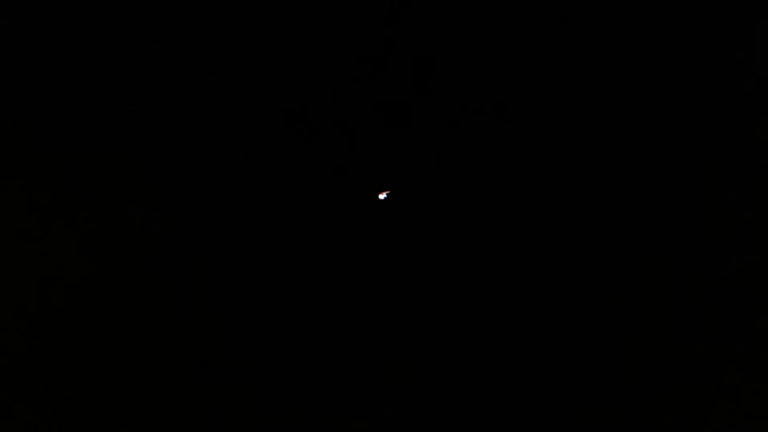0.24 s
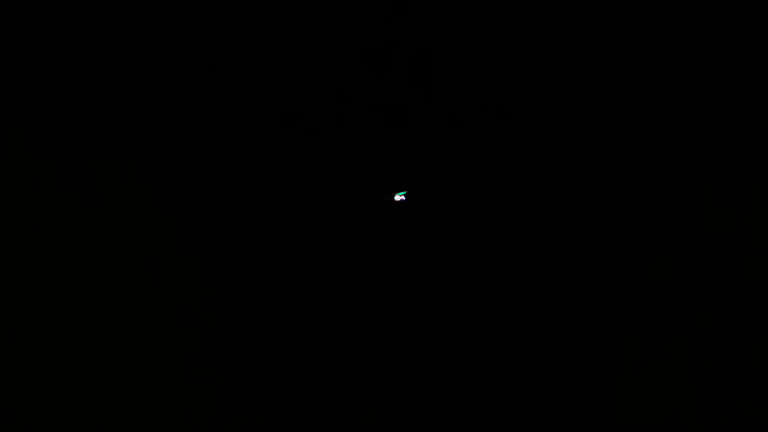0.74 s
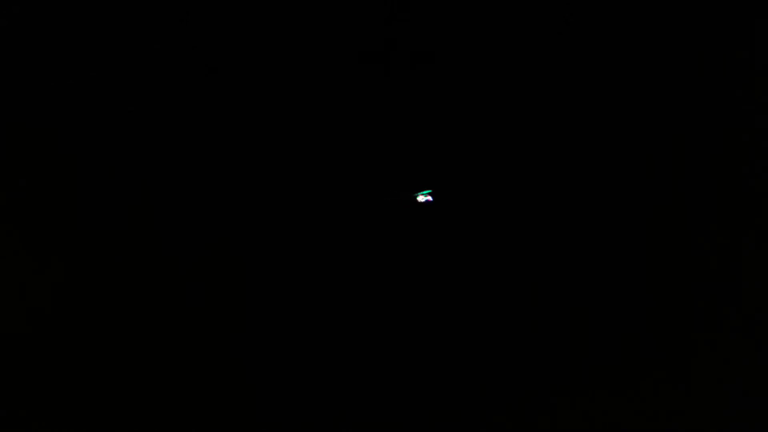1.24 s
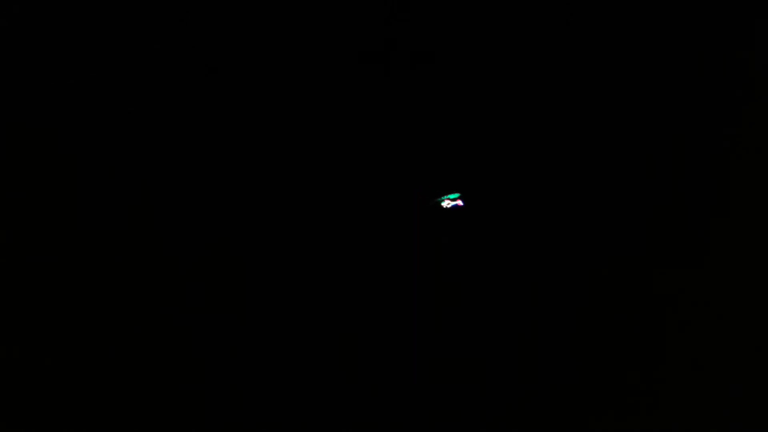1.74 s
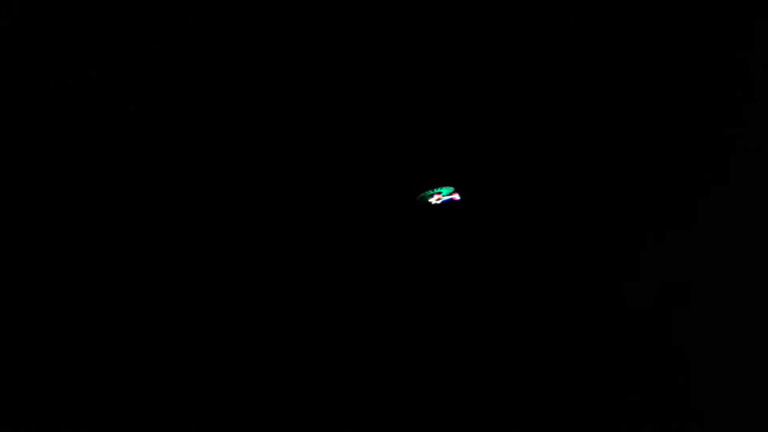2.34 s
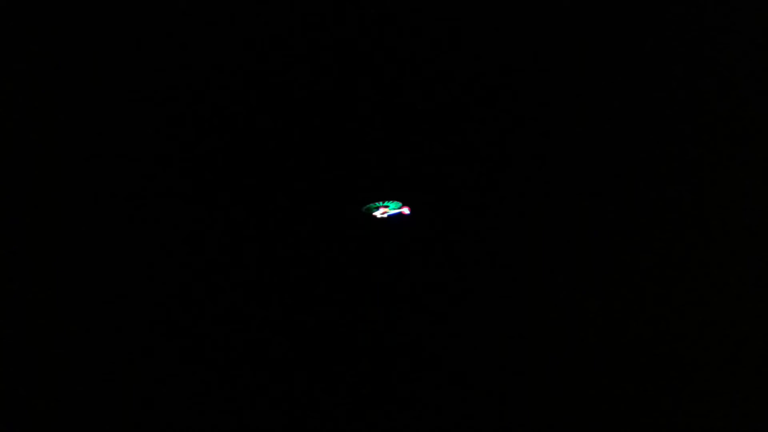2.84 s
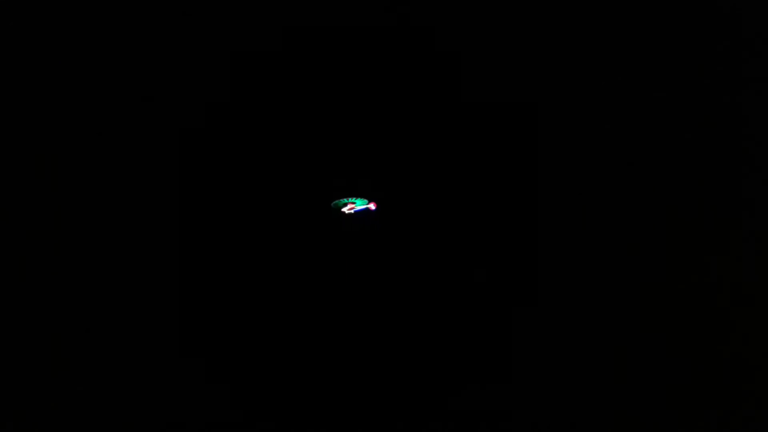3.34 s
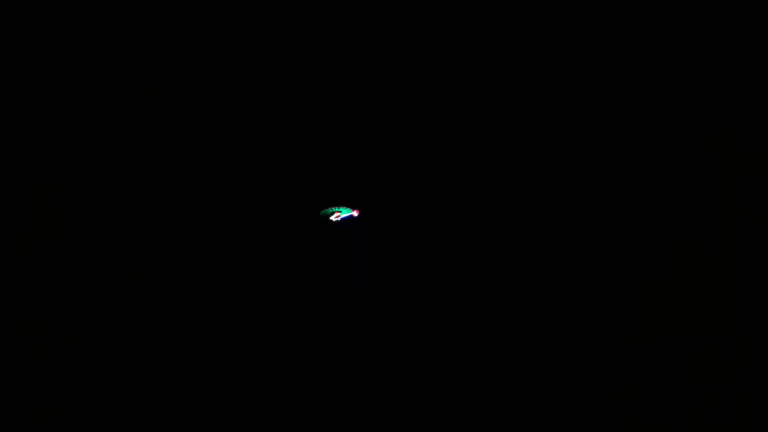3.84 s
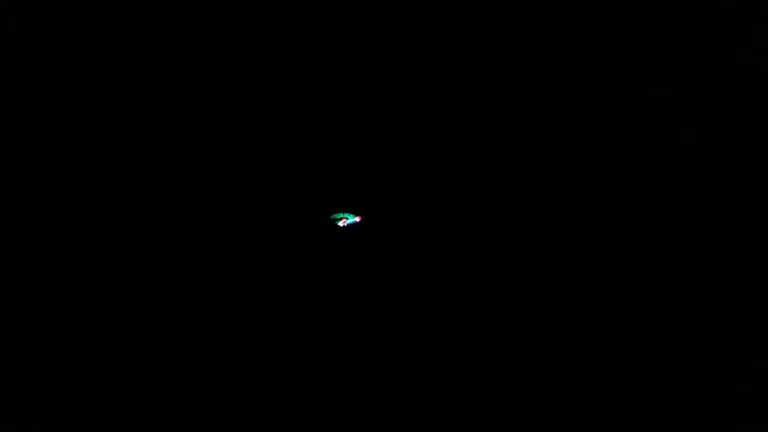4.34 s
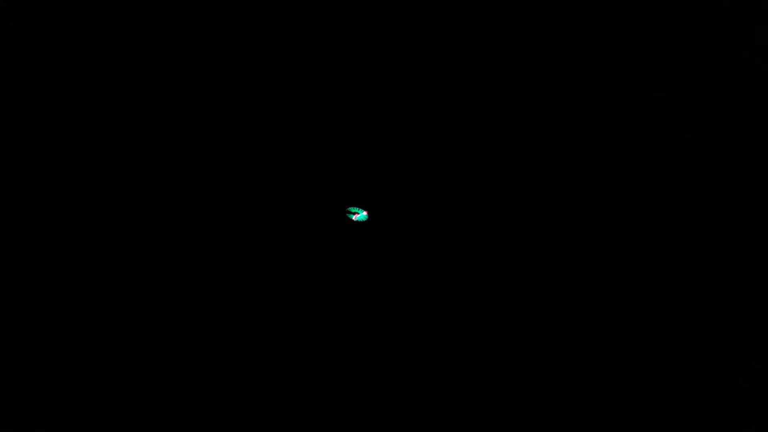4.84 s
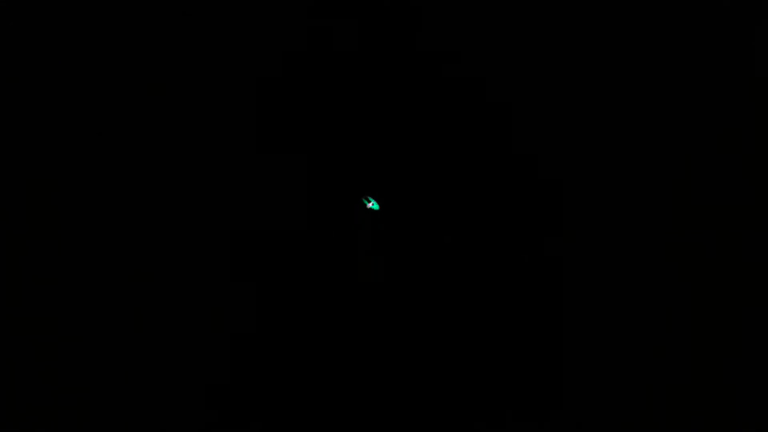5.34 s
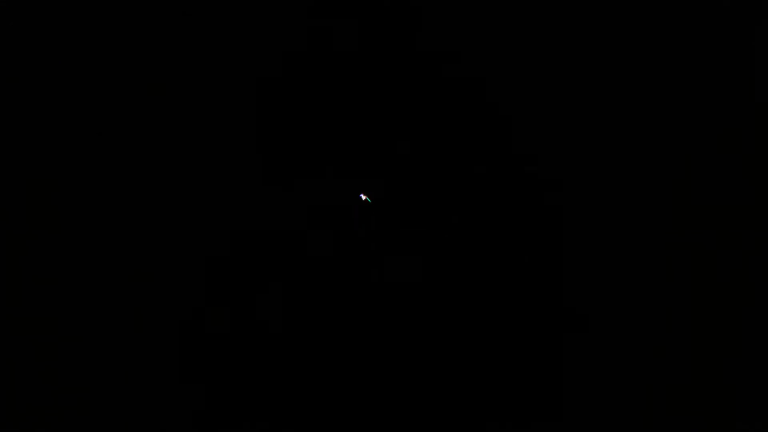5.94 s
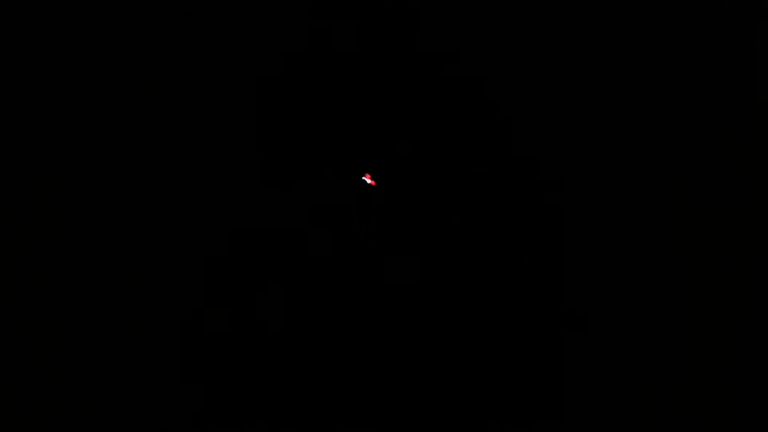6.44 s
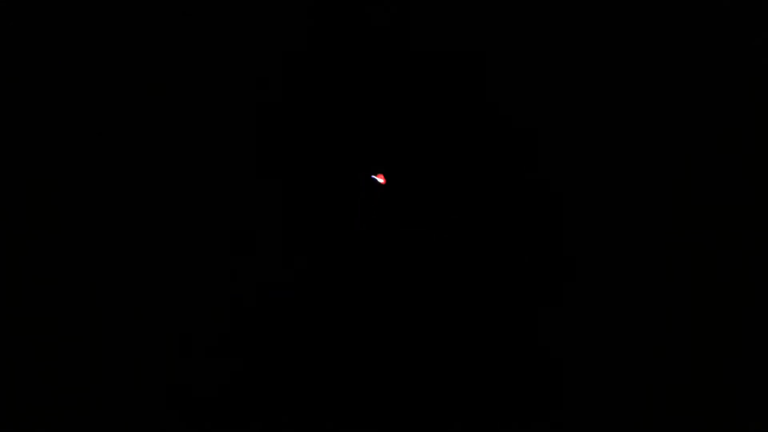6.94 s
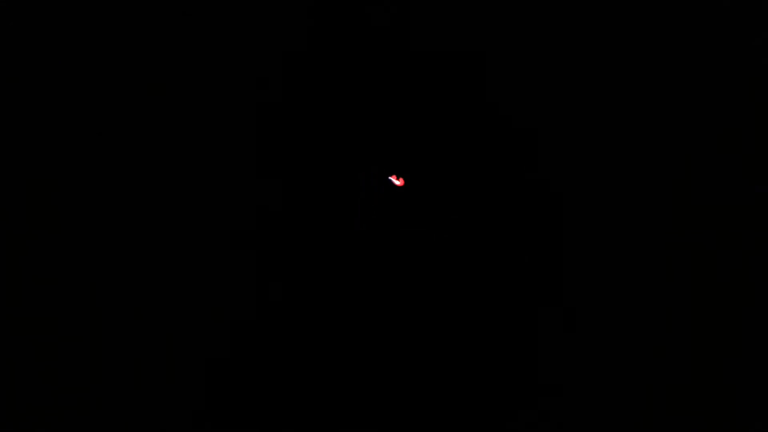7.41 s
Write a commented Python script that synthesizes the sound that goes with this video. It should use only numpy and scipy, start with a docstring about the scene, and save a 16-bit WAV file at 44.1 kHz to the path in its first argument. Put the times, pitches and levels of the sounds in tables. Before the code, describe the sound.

A model helicopter's steady buzz and airy hiss grow nearer, joined by a bright, rasping gear whine as it brakes and passes. After the turn the hiss thins and throbbing motor tones stand out, gliding down, then slightly up. Hard wind gusts hit the unprotected microphone, densest between two and three seconds and again near five, mostly in the right channel, with some early thumps on the left.

```python
"""Open ground: an electric model helicopter flies towards the listener, passes and turns away.
The blades hiss and whistle, chopped by the rotors; the tail rotor buzzes and the motor and gears whine.
One shaft speed sets the pitch of buzz and whine and the pace of the chopping. The ground reflects hiss and buzz.
Gusts of wind rumble and thump on the two microphone ports, mostly the right one."""
import sys
import numpy as np
from scipy import signal
from scipy.fft import rfft, irfft, next_fast_len
from scipy.io import wavfile
from scipy.ndimage import map_coordinates

SR = 44100
rng = np.random.default_rng(int(sys.argv[2]) if len(sys.argv) > 2 else 0)


def digitize_waveform(pressure):
    """Quantize a signal to 16-bit integers and store it at the path in sys.argv[1].

    Rows of a 2-D input are taken as channels; values are limited to [-1, 1].
    """
    field = np.atleast_2d(pressure).T
    bounded = np.clip(field, -1, 1)
    quanta = np.round(bounded * 32767).astype(np.int16)
    wavfile.write(sys.argv[1], SR, quanta)


N = 338247
TIME = np.arange(N) / SR  # seconds

# How loud the blade hiss is, which also tells how near the helicopter is. Each row: time in seconds,
# relative level in dB, relative level of the treble against the middle in dB.
HISS_LEVEL = [(0, -41.5, -8.5), (1.22, -35, -10), (1.29, -32.5, -7), (1.8, -32, -8), (2.3, -23.5, -9.5),
              (2.6, -27.5, -10), (3.04, -22, -10), (3.37, -28.5, -7.5), (4.8, -32.5, -8), (5.35, -38.5, -4),
              (6.17, -46, -3), (6.33, -42, -1.5), (6.8, -39.5, -10), (7.2, -37.5, -13), (7.67, -37, -13.5)]
# How strongly the tail rotor sounds this way. Each row: time in seconds, level in dB,
# highest harmonic that it carries at full strength.
TAIL_ROTOR_BEAM = [(0, -48, 2.7), (1.36, -43.5, 5.5), (2.1, -47.5, 6.5), (3, -45, 19), (4.25, -51, 16),
                   (5.66, -62.5, 3.1), (6.5, -51.5, 4.5), (7.2, -48, 8), (7.67, -46.5, 8.7)]
TAIL_RATIO = 20 / 21  # tail blades passing per motor turn
MAIN_RATIO = 1 / 10  # main rotor turns per motor turn
HARD_GUST_DB = -19  # around this level gusts become abrupt and blow more evenly


def undb(db):
    """Decibels to gain."""
    return 10 ** (np.asarray(db) / 20)


def curve(rows, axis=1):
    """One column of a table, joined by straight lines in time."""
    rows = np.array(rows)
    return np.interp(TIME, rows[:, 0], rows[:, axis])


def walk(hz):
    """Smooth random wandering of unit spread that moves at up to about hz."""
    f = np.fft.rfftfreq(N, 1 / SR)
    count = np.searchsorted(f, 4 * hz) + 2
    spectrum = rng.standard_normal(count) + 1j * rng.standard_normal(count)
    slow = irfft(np.exp(-.5 * (f[:count] / hz) ** 2) * spectrum, 16 * count)
    slow = slow / slow.std()
    return np.interp(np.linspace(0, len(slow), N), np.arange(len(slow)), slow)


def noise(colour, lo_hz, hi_hz):
    """Coloured noise whose level is set by the average power gain between lo_hz and hi_hz."""
    size = next_fast_len(N, True)
    f = np.fft.rfftfreq(size, 1 / SR)
    hz, db = np.transpose(colour)
    gain = undb(np.interp(np.log(f + 1), np.log(hz), db))
    inside = (f > lo_hz) * (f < hi_hz)
    gain = gain / np.sqrt(np.mean(gain ** 2 * inside))
    return irfft(rfft(rng.standard_normal(size)) * gain, size)[:N]


def narrow_noise(phase, width_hz):
    """Noise in a narrow band: a tone whose two quarter-turn parts wander at random."""
    return walk(width_hz) * np.cos(phase) + walk(width_hz) * np.sin(phase)


def lowpass(x, hz):
    """Gentle low-pass without delay."""
    return signal.sosfiltfilt(signal.butter(2, min(hz, SR / 2 - 1), fs=SR, output="sos"), x)


def late(x, ms):
    """The sound a steady or moving lag later."""
    return np.interp(TIME - ms * 1e-3, TIME, x)


def reflect(x, ground, holder, holder_ms):
    """The ground adds a sweeping comb, a surface close to the microphone a fixed one."""
    # Lag of the ground reflection. Each row: time in seconds, lag in ms.
    ground_lag = [(0, 4.05), (1, 4.16), (1.7, 4.07), (2.3, 3.8), (3, 3.73), (4.7, 3.3), (5.7, 4.3),
                  (7.67, 3.15)]
    x = x + ground * late(lowpass(x, 11000), curve(ground_lag))
    x = x + holder * late(lowpass(x, 2460), holder_ms)
    return x / np.sqrt((1 + ground ** 2) * (1 + holder ** 2))


def through_air(x, split_hz):
    """Air takes the top off the whine when the helicopter is far away."""
    air_loss = 1  # dB of treble lost for each dB that the hiss lies below its loudest
    hiss_db = curve(HISS_LEVEL)
    body = lowpass(x, split_hz)
    return body + (x - body) * undb(air_loss * (hiss_db - hiss_db.max()) + 9.0)


def tones(turns, orders, fade_db, rough, apart, pulsed=False):
    """Partials of a shaft, in step if pulsed; air makes each fade and flutter, a little differently at each port."""
    smear_order = 16  # the moving air smears partials above this multiple more and more
    out = np.zeros((2, N))
    for order, db in orders:
        start = 0 if pulsed else rng.random()
        smear = rough * max(1, order / smear_order) ** 3 * walk(12)
        phase = 2 * np.pi * (order * turns + start) + smear
        size = np.sqrt(2) * undb(db + fade_db * walk(3.3)) * (1 + rough * walk(18))
        mid = size * np.sin(phase)
        side = size * np.cos(phase) * apart * walk(1.0)
        out += [mid + side, mid - side]
    return out


def wind_strength(port):
    """Each gust rises, holds and dies away over the breeze; the sheltered port gets less of it."""
    # The breeze between gusts. Each row: time in seconds, left port level in dB, right port level in dB.
    breeze = [(0, -45, -57), (1.1, -54, -44), (1.7, -62, -44.5), (2.4, -65, -15), (2.85, -65, -31.5),
              (3.8, -71, -52), (4.6, -56, -42.5), (5.6, -53, -48), (6.3, -66, -48.5), (6.8, -72, -56)]
    # Gusts. Each row: start in seconds, length in seconds, level in dB on the windward port,
    # left minus right in dB.
    gusts = [(.005, 0.11, -21.5, 22), (0.176, 0.029, -22, 29), (0.607, 0.036, -37, 20),
             (0.76, 0.04, -34, -4), (0.826, 0.066, -28, 21), (0.967, 0.029, -32.5, 2),
             (1.213, 0.058, -22.5, -29), (1.407, 0.03, -35.5, 17), (1.618, 0.037, -33, 16),
             (1.931, 0.11, -17.5, -40), (2.088, 0.029, -14, -30), (2.169, 0.11, -16.5, -39),
             (2.332, 0.048, -21, -36), (2.379, 0.03, -11.5, -37), (2.429, 0.062, -11.5, -40),
             (2.557, 0.098, -11, -37), (2.689, 0.022, -16, -21), (2.727, 0.023, -15, -26),
             (2.955, 0.013, -17, -26), (2.984, 0.049, -14.5, -24), (3.034, 0.051, -10, -32),
             (3.181, 0.052, -22.5, -19), (3.361, 0.11, -30.5, -24), (3.608, 0.077, -34, -30),
             (4.154, 0.046, -26.5, -34), (4.3, 0.051, -31, -25), (4.418, 0.078, -36.5, -23),
             (4.81, 0.059, -18, -35), (5.013, 0.022, -13, -20), (5.045, 0.038, -16, -23),
             (5.106, 0.097, -22.5, -10), (5.243, 0.062, -30.5, -20), (5.857, 0.034, -35.5, -18),
             (6.208, 0.051, -40, -2.5), (7.583, 0.0098, -33, -26)]
    attack_s, release_s = 0.02, 0.024  # for the weakest gusts; harder ones are quicker
    power = undb(curve(breeze, axis=1 + port)) ** 2
    for start, length, db, left_db in gusts:
        near = slice(*np.searchsorted(TIME, [start - .1, start + length + .2]))
        age = TIME[near] - start
        # a harder gust starts and stops more abruptly
        haste = 1 + undb(db - HARD_GUST_DB)
        rise = np.minimum(age, 0) / attack_s
        fall = np.maximum(age - length, 0) / release_s
        shape = np.exp(haste ** 2 * (rise - fall))
        shelter_db = max(left_db if port else -left_db, 0)
        power[near] += (undb(db - shelter_db) * shape) ** 2
    return np.sqrt(power)


def eddies(hits, cycles):
    """Each eddy (seconds, size) is a pressure swing of about one cycle, quicker the harder it hits."""
    base_hz, rise_hz, steepness = 366, 173, 1.31  # rate of a weak eddy, its rise at size 1, and the power law
    out = np.zeros(N)
    for (s, size), phase in zip(hits, rng.uniform(-1, 1, len(hits))):
        near = slice(*np.searchsorted(TIME, [s - .02, s + .02]))
        swing = (TIME[near] - s) * (base_hz + rise_hz * size ** steepness)
        # it strikes fast, then slows and dies away
        swing = swing / (1 + 0.56 * np.tanh(swing))
        out[near] -= size * np.exp(-(swing / cycles) ** 2) * np.cos(2 * np.pi * swing + phase)
    # the capsule's vent leaks the slowest pressure away
    return signal.sosfilt(signal.butter(2, 130, "high", fs=SR, output="sos"), out)


def wind(strength, other, flow_db, patchy_db, crackle_db):
    """Patchy turbulence on one port with small eddies in it; hard ones hit while it has the stronger wind."""
    # Turbulence colour behind the port. Each row: pitch in Hz, relative dB per Hz.
    wind_colour = [(30, -75), (80, -51), (130, -5.5), (220, 3), (350, -1.5), (550, -13.5), (900, -29),
                   (1500, -35), (3000, -64)]
    # The hardest eddies, which hit the windward port. Each row: time in seconds, size in dB.
    thumps = [(.023, -1.5), (.064, -8.5), (0.096, -9.5), (.18, -5), (0.183, -1), (.786, -13), (.877, -16),
              (1.236, -9), (1.253, -10.5), (1.948, -5.5), (1.957, -5), (2.099, -10), (2.111, -22),
              (2.186, -11.5), (2.223, -3.5), (2.235, -5), (2.259, -10), (2.359, -3.5), (2.384, -5),
              (2.411, -0.5), (2.449, 1.5), (2.461, -5), (2.498, -1.5), (2.564, 5.5), (2.574, 2),
              (2.591, -2), (2.599, 0), (2.607, 6.5), (2.612, -1), (2.643, -2), (2.651, 2), (2.692, -4.5),
              (2.704, -2), (2.726, 0), (2.731, 3), (2.781, -2), (2.903, -6), (2.969, -4), (3.016, -2),
              (3.056, 0.5), (3.064, -2), (3.074, -3.5), (3.122, -9.5), (3.197, -10), (3.211, -8.5),
              (4.774, -9.5), (4.799, -2), (4.825, -3.5), (4.838, -0.5), (4.844, 1.5), (4.853, -2),
              (4.872, -1.5), (5.008, -1), (5.033, 1), (5.039, 0), (5.071, 0.5), (5.075, -2.5),
              (5.109, -4.5), (5.163, 1.5), (5.183, -1.5), (5.19, 9), (5.244, -9.5), (5.261, -10.5),
              (5.294, -8.5), (5.297, -4), (5.389, -9), (5.478, -15.5), (5.872, -19), (7.449, -20.5)]
    eddies_per_s, eddy_db, scatter_db = 130, -.5, 2  # small eddies: level against the wind strength, spread
    split_hz, knee_db = 284, -29.5  # turbulence below this pitch stops growing near this strength

    patches = np.tanh(walk(37.5)) / np.sqrt(1 + strength / undb(HARD_GUST_DB))
    flow = noise(wind_colour, 0, SR) * strength * undb(flow_db + patchy_db * patches)
    flow = flow - lowpass(flow, split_hz) * strength / (strength + undb(knee_db))

    at = rng.integers(0, N, int(eddies_per_s * N / SR))
    sizes = strength[at] * undb(eddy_db + scatter_db * rng.uniform(-1, 1, len(at)))
    small = eddies(list(zip(TIME[at], sizes)), cycles=0.7)
    hits = [(s, undb(db)) for s, db in thumps if strength[int(s * SR)] > other[int(s * SR)]]
    hard = eddies(hits, cycles=0.63)

    # strong flow is brighter and crackles
    crackle_band = signal.butter(2, [700, 1500], "band", fs=SR, output="sos")
    crackle = signal.sosfilt(crackle_band, (flow + small) ** 2)
    return flow + small + hard + undb(crackle_db) * crackle


def blade_whistle(turns, width_hz, flutter):
    """Vortices shed by the main blades sing in narrow bands that swell once each turn of the main rotor."""
    # Middle pitches of the two whistles in Hz.
    whistle_hz = [1908, 2470]
    # Their beams. Each row: time in seconds, lower whistle in dB, upper whistle in dB.
    whistle_beam = [(0, -54.5, -55), (1.4, -48, -46), (4.5, -46, -49), (5.7, -72, -68), (6.8, -68.5, -60),
                    (7.1, -46.5, -53), (7.67, -52, -54)]
    ports = np.zeros((2, N))
    for k, hz in enumerate(whistle_hz):
        ports += undb(curve(whistle_beam, axis=1 + k)) * narrow_noise(2 * np.pi * hz * TIME, width_hz)
    return ports * (1 + flutter * np.cos(2 * np.pi * MAIN_RATIO * turns))


def blade_hiss(turns, tail_chop, main_chop, flutter):
    """Turbulence off the blades, chopped by both rotors; the ports agree less towards the treble."""
    # Blade hiss colour. Each row: pitch in Hz, relative dB per Hz.
    hiss_colour = [(50, -74), (120, -6.5), (250, -6), (450, -9.5), (700, 0), (1300, 0.5), (1900, 1.5),
                   (2800, -1), (3500, 2), (4200, 3), (5500, -10.5), (7500, -9), (9300, -19.5), (11000, -30),
                   (14500, -43)]
    mid, side = (noise(hiss_colour, 1500, 3400) for _ in range(2))
    side = .7 * side - .38 * lowpass(side, 5200)

    # two main blades pass each turn, and one tracks a little higher than the other
    rotor = 2 * np.pi * MAIN_RATIO * turns
    chop = 1 + tail_chop * np.cos(2 * np.pi * TAIL_RATIO * turns)
    chop += main_chop * np.cos(2 * rotor) + flutter * np.cos(rotor)
    ports = np.array([reflect(chop * port, ground=0.37, holder=0.26, holder_ms=1.614)
                      for port in (mid + side, mid - side)])

    low, body = lowpass(ports, 1050), lowpass(ports, 6400)
    treble = (ports - body) * undb(curve(HISS_LEVEL, axis=2) + 10.0)
    # gusty air fades each band by itself, and all of them together
    mixed = sum(band * undb(1.5 * walk(7.2)) for band in (low, body - low, treble))
    return mixed * undb(curve(HISS_LEVEL) + .5 * walk(16.0) - 4.5)


def tail_rotor(turns):
    """The tail rotor's buzz, one pulse a blade; the turn shows its other side, with another mix of harmonics."""
    # Harmonics. Each row: multiple of the blade rate, relative dB before the turn, relative dB after it.
    harmonics = [(1, 6, 6), (2, 2.5, -2), (3, -4, 5.5), (4, -1.5, 1.5), (5, -11, 3.5), (6, -1.5, -2),
                 (7, 6.5, 2.5), (8, -12, -20), (9, 4.5, -13)]
    turn_s, turn_length_s = 3.73, 1.5  # middle and duration of the turn
    fall_db = 7.5  # loss per harmonic beyond the beam's reach
    turned = np.clip(.5 + (TIME - turn_s) / turn_length_s, 0, 1)
    reach = curve(TAIL_ROTOR_BEAM, axis=2)
    orders = []
    for order, before, after in harmonics:
        loss_db = fall_db * np.maximum(order - reach, 0)
        orders.append((order, before + (after - before) * turned - loss_db))
    buzz = tones(TAIL_RATIO * turns, orders, fade_db=1, rough=.06, apart=.15, pulsed=True)
    buzz = buzz * undb(curve(TAIL_ROTOR_BEAM))
    return np.array([reflect(port, ground=.2, holder=.3, holder_ms=1.7) for port in buzz])


def gear_rasp(turns, mesh_db, wash_db, third_db):
    """Uneven teeth smear noise next to the mesh tone, in a wider wash above it and round its third harmonic."""
    # Rasp, strongest as the helicopter brakes. Each row: time in seconds, relative level in dB.
    rasp_level = [(0, -53), (1.35, -37), (1.85, -34), (2.22, -25), (2.6, -28), (2.93, -24), (2.99, -19),
                  (3.1, -23), (4.4, -37), (7.1, -46), (7.5, -38)]
    rasp_db, hiss_db = curve(rasp_level), curve(HISS_LEVEL)
    # the highest band carries less far than the hiss
    far_db = hiss_db + 0.35 * (hiss_db - hiss_db.max())
    # multiple of motor speed, width in Hz, level in dB
    bands = ((14.4, 200, rasp_db + mesh_db), (16.3, 350, rasp_db + wash_db), (42, 330, far_db + third_db))
    ports = np.zeros((2, N))
    for order, width_hz, db in bands:
        phase = 2 * np.pi * order * turns
        ports += undb(db) * np.array([narrow_noise(phase, width_hz) for _ in range(2)])
    return ports


def gears(turns):
    """The tail drive loads the gears once each turn: their whine and rasp throb, and the mesh drags a little."""
    # Mesh of the 14-tooth pinion. Each row: multiple of motor speed, relative level in dB.
    mesh_tones = [(14, 2), (28, -20), (42, -31)]
    # Its beam as the body turns. Each row: time in seconds, level in dB.
    mesh_beam = [(0, -46), (1.5, -40), (2.5, -44), (3.05, -30), (3.43, -37), (3.85, -32), (4.3, -38),
                 (4.52, -48), (4.95, -38), (5.65, -55), (5.95, -41), (6.1, -45), (6.3, -34), (6.7, -35.5),
                 (7.67, -56)]
    # Tones of the slightly off-centre pinion. Each row: multiple of motor speed, relative level in dB.
    pinion_tones = [(15, 0), (17, -19.5), (26, -19.5), (34, -26)]
    # Its beam. Each row: time in seconds, level in dB.
    pinion_beam = [(0, -60), (1.4, -47), (2.95, -40), (3.25, -29.5), (4.15, -41), (5.1, -35), (5.5, -53),
                   (6.1, -54), (6.35, -42), (6.9, -52)]
    # How deeply the gears throb. Each row: time in seconds, average depth from 0 to 1.
    throb_depth = [(0, .3), (3, .4), (4.4, .65), (6.5, .65), (7.3, .4)]
    drive_ratio = .62  # turns of the tail drive per motor turn
    drag_turns = .004  # how far the mesh drags at throb depth 1, in motor turns

    beat = 2 * np.pi * drive_ratio * turns
    depth = curve(throb_depth) * (1 + .2 * walk(40))
    dragged = turns - drag_turns * depth * np.sin(beat)
    mesh = tones(dragged, mesh_tones, fade_db=1, rough=.17, apart=.4) * undb(curve(mesh_beam))
    pinion = tones(turns, pinion_tones, fade_db=1, rough=.18, apart=.4) * undb(curve(pinion_beam))
    whine = through_air(mesh + pinion, split_hz=5900)
    rasp = gear_rasp(turns, mesh_db=-8, wash_db=-15.5, third_db=-24.5)
    return (1 + depth * np.cos(beat)) * (whine + rasp)


def motor_whine(turns):
    """Magnets, slots and shaft ring at multiples of motor speed, each group with its own beam."""
    # Tones of magnets, slots and shaft. Each row: multiple of motor speed, relative level in dB.
    magnet_tones = [(8, -19), (10, 6.5), (11, -6), (21, -23), (22, -13)]
    slot_tones = [(18, 0)]
    shaft_tones = [(7, -15), (8, -15), (11, -10), (13, -11), (14.25, -9), (17.38, -9), (19.38, -16),
                   (20, -10), (21, -11), (28, -10), (42, -15)]
    # Beams of magnets and slots, then the bare side of the drive, which faces the listener
    # during the turn. Each row: time in seconds, level in dB.
    magnet_beam = [(0, -63), (2.7, -58), (4.5, -62), (4.75, -46), (4.95, -38.5), (5.35, -44), (5.52, -62),
                   (5.88, -48), (6.15, -53), (6.35, -47.5), (6.55, -56), (6.85, -70)]
    slot_beam = [(0, -68), (3.1, -50), (4.98, -55), (5.33, -36), (5.5, -54), (7.67, -60)]
    exposed = [(0, -51), (2, -62), (4.5, -39.5), (5.8, -41), (6.4, -42.5), (7.67, -47.5)]
    magnets = tones(turns, magnet_tones, fade_db=1, rough=.12, apart=.3) * undb(curve(magnet_beam))
    slots = tones(turns, slot_tones, fade_db=1, rough=.12, apart=.3) * undb(curve(slot_beam))
    shaft = tones(turns, shaft_tones, fade_db=3, rough=.15, apart=.5) * undb(curve(exposed))
    return through_air(magnets + slots + shaft, split_hz=5900)


def helicopter():
    """Rotors, motor and gears on one shaft."""
    # Motor speed as heard: it drops as the helicopter slows its approach and climbs after the turn.
    # Each row: time in seconds, turns per second.
    motor_speed = [(0, 303.9), (.3, 304.8), (.95, 304.85), (1.55, 303.1), (2.05, 299.7), (2.4, 296.6),
                   (3.05, 287.6), (3.45, 283.7), (3.9, 280.6), (4.8, 277.3), (5.35, 274.4), (6.02, 272.7),
                   (6.85, 277.2), (7.67, 284.7)]
    # Bearing. Each row: time in seconds, lag of the right port behind the left in ms.
    bearing = [(0, 0.027), (2.2, 0.069), (3.1, 0.035), (5.2, 0.019), (7.67, 0.051)]
    turns = np.cumsum(curve(motor_speed) * (1 + 0.00038 * walk(6.9))) / SR
    # the more the tail rotor beams this way, the deeper it chops the hiss: 0.55 at equal table levels
    tail_chop = np.minimum(0.55 * undb(curve(TAIL_ROTOR_BEAM) - curve(HISS_LEVEL)), 1)
    air = blade_hiss(turns, tail_chop, main_chop=0.049, flutter=0.04)
    air += blade_whistle(turns, width_hz=45, flutter=.6)
    left, right = tail_rotor(turns) + gears(turns) + motor_whine(turns) + air
    # it flies slightly off axis, so one port hears it a little later
    right = map_coordinates(right, [(TIME - curve(bearing) * 1e-3) * SR], mode="nearest")
    return np.array([left, undb(-1.83) * right])


def scene():
    """The helicopter in both channels, the wind on each port by itself."""
    left, right = wind_strength(0), wind_strength(1)
    gusty = np.array([wind(own, other, flow_db=3.0, patchy_db=8.5, crackle_db=-4.0)
                      for own, other in ((left, right), (right, left))])
    return gusty + helicopter()


def record(dry):
    """The strongest thumps overload the input; the top is cut."""
    clipped = np.clip(dry, -1, 1)
    top_hz = 14700
    return signal.sosfilt(signal.ellip(8, .2, 70, top_hz, fs=SR, output="sos"), clipped)


dry = scene()
out = record(dry)
digitize_waveform(out)
```